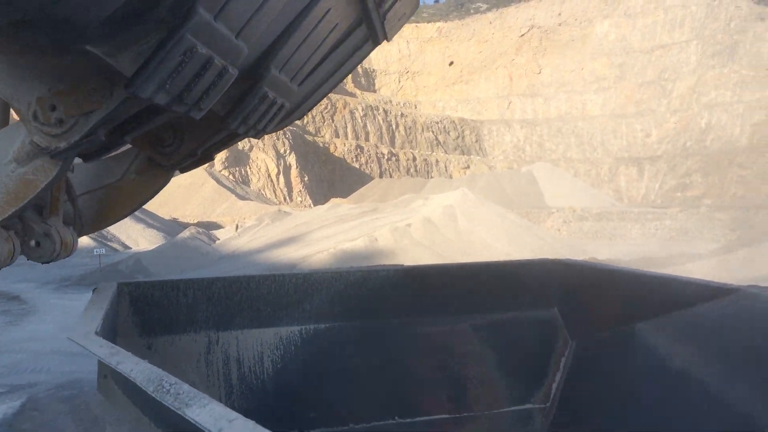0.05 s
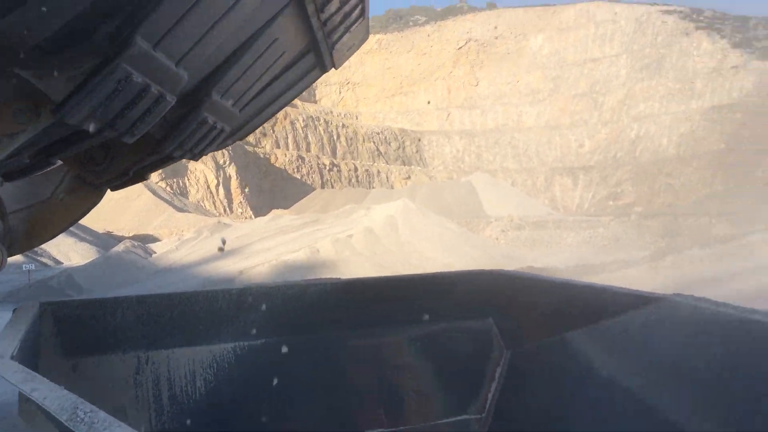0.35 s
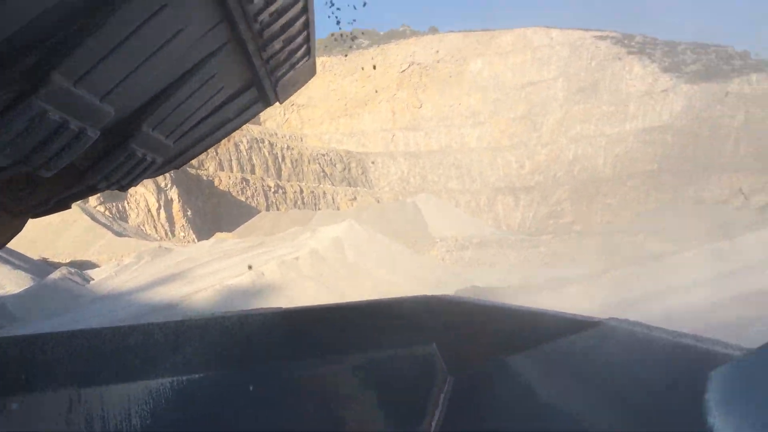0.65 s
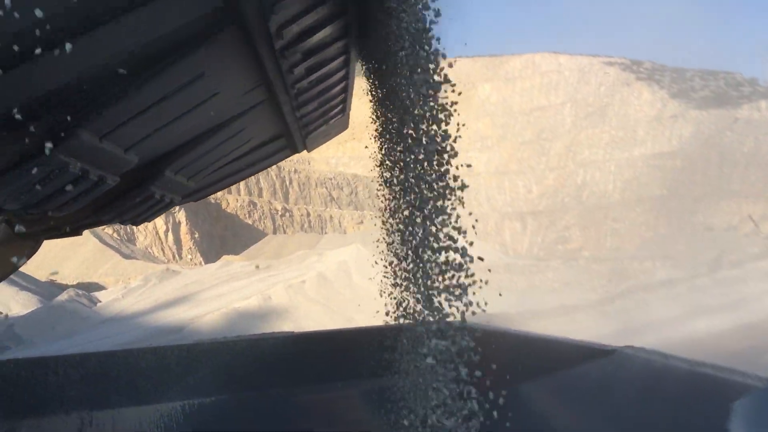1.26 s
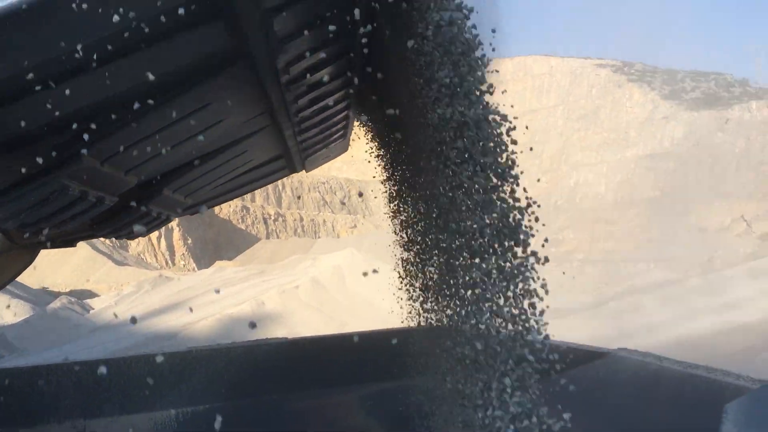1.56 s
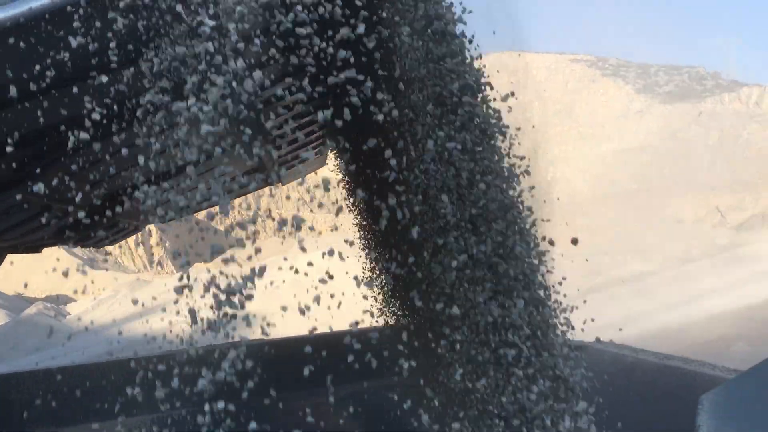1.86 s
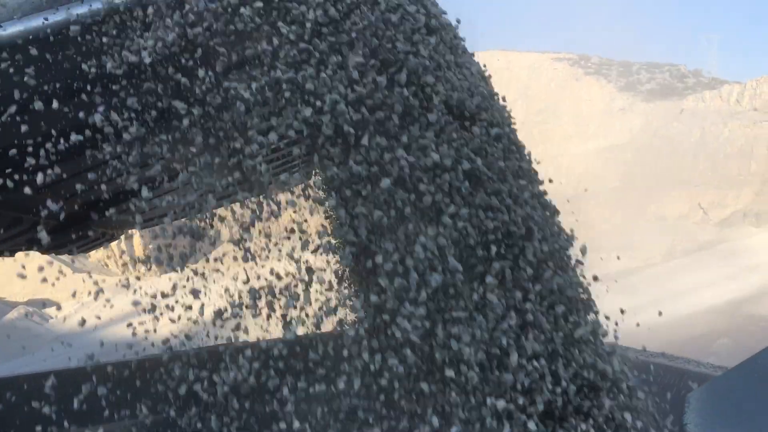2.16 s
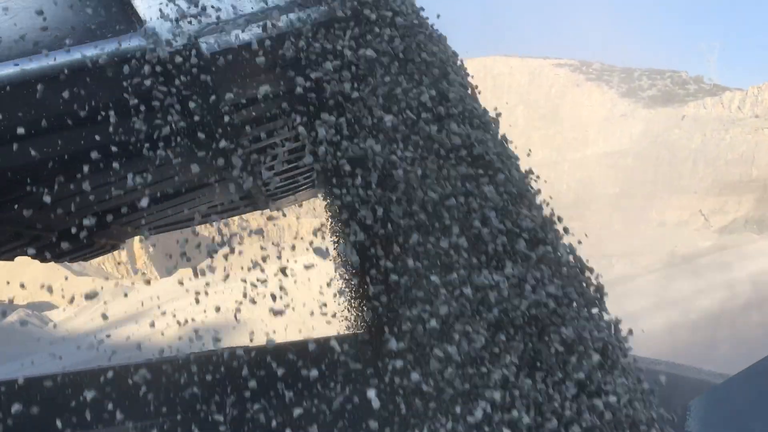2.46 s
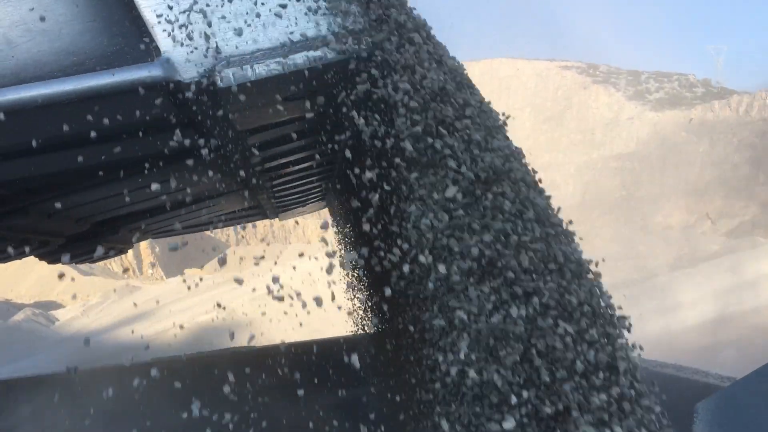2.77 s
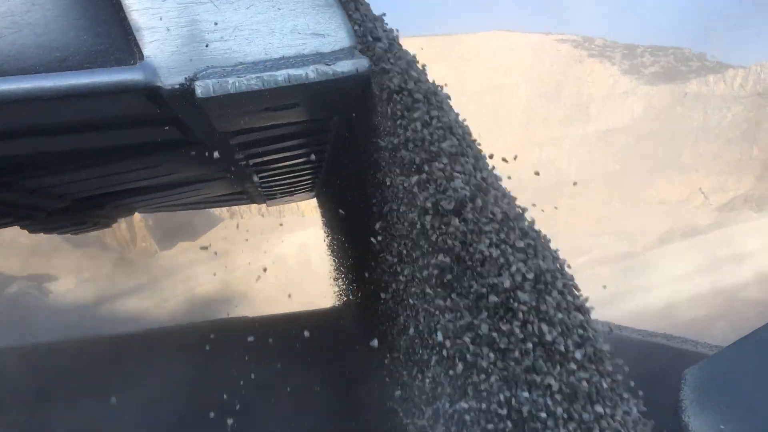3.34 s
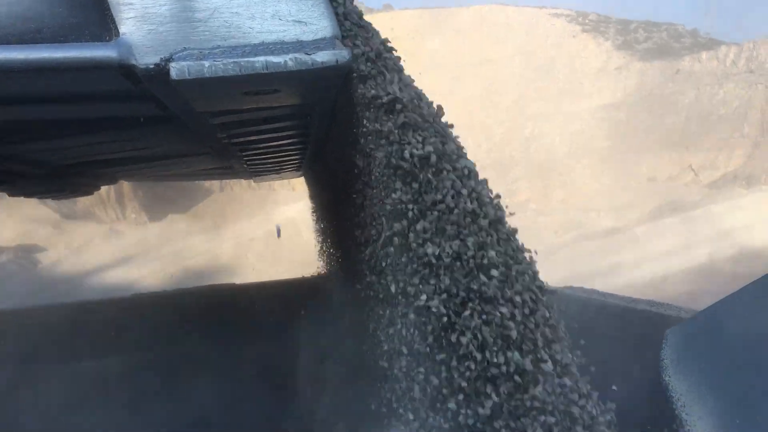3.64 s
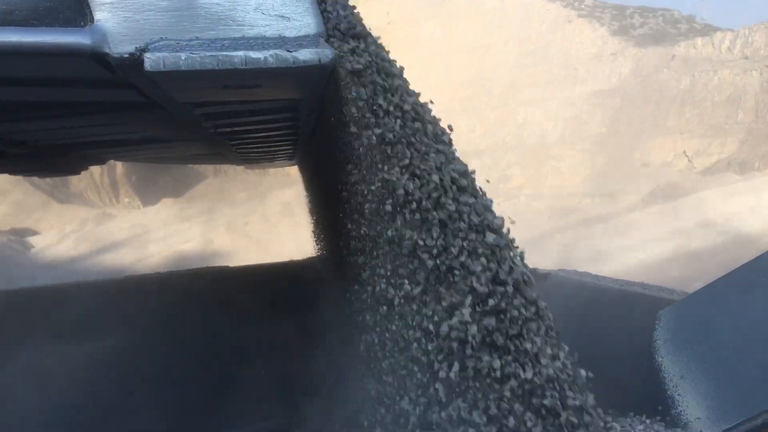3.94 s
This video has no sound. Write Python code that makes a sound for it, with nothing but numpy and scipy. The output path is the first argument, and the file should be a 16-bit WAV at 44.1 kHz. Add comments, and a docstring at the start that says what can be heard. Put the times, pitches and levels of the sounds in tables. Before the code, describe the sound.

A load of gravel tips into a metal hopper nearby. Light rattling knocks come first, then a hiss of grit swells into a continuous rush of stones, all over a loud, low diesel drone.

```python
"""Tipping crushed stone into a steel hopper

A dumper's diesel engine drones close by at steady revs. Its rising bed rattles and the first
stones clink. Fine grit starts to hiss down the steel, then the whole load slides and pours:
thousands of tiny stone-on-stone hits a second blend into a rush, and the hopper booms under it."""
import sys
import numpy as np
from scipy import signal
from scipy.fft import rfft, irfft
from scipy.io import wavfile
from scipy.ndimage import uniform_filter1d

SR = 44100
rng = np.random.default_rng(int(sys.argv[2]) if len(sys.argv) > 2 else 0)


def pcm_store(signal):
    """Save signal as 16-bit PCM."""
    levels = np.round(np.clip(np.atleast_2d(signal), -1, 1) * 32767)
    wavfile.write(sys.argv[1], SR, levels.astype(np.int16).T)


N = 176400  # 4 seconds

# How strongly coarse stone and fine grit flow. Each row: time in seconds, level in dB.
STONE_LEVELS = [(0, -82), (1.3, -56), (1.8, -47), (1.97, -39.5), (2.15, -36), (2.29, -33), (2.52, -33.5),
                (2.68, -37), (3.3, -36.5), (4, -37.5)]
GRIT_LEVELS = [(0, -84), (1.15, -65), (1.35, -52), (1.65, -47), (1.85, -43), (2.0, -39), (2.15, -36),
               (2.35, -33.5), (2.9, -33.5), (3.4, -34.5), (4, -35.5)]
# The tone of stone, of grit and of a dull knock. Each row: frequency in Hz, relative level in dB.
STONE_TONE = [(200, -4), (700, -5), (1000, -4), (1300, -2.5), (1550, -2), (1800, 1), (2080, 0.5),
              (2500, -3), (2850, -2.5), (3150, 0.5), (3700, 0), (4050, 1), (4900, -5), (5600, -2.5),
              (6500, -3.5), (7500, -5.5), (10000, -11.5), (15000, -27)]
GRIT_TONE = [(3000, -21), (5000, -12.5), (6300, -6), (7400, -9.5), (8600, -1), (9800, -0.5), (10450, -8),
             (10900, 0), (12600, 0.5), (14000, -1.5), (15600, -4)]
KNOCK_TONE = [(700, -11), (1500, 3), (2100, 8), (2700, 4), (3400, 5.5), (4300, 3), (5200, -2.5),
              (6500, -3.5), (8000, -12.5), (15000, -26)]
# The notes that ring in the hopper, the bed's panels, bright steel and a struck edge.
# Each row: frequency in Hz, width in Hz (narrow rings longer), relative level in dB.
HOPPER_NOTES = [(158, 49, -1.5), (312, 140, -11), (714, 150, -5), (1807, 50, -9), (2029, 36, -5),
                (2110, 45, -10)]
PANEL_NOTES = [(2037, 28, -1), (2500, 41, -8.5), (3260, 63, -1.5)]
STEEL_NOTES = [(3284, 40, -7), (6140, 30, -4), (6700, 80, -1), (8161, 200, -5), (8600, 500, 2.5),
               (9060, 80, -2), (9100, 400, -17), (12460, 1500, -13)]
EDGE_NOTES = [(6940, 19, -1), (7080, 300, -4)]
# Knocks of the bed and first stones. Each row: start in seconds, dull level in dB, ring level in dB.
BED_KNOCKS = [(0.002, -45, -59), (0.046, -47, -56), (0.086, -44, -56), (0.131, -42.5, -62),
              (0.174, -42, -48), (0.214, -43, -56), (0.258, -48, -59), (0.299, -44, -59), (0.343, -41, -53),
              (0.386, -41, -50.5), (0.426, -39, -52), (0.469, -40.5, -51), (0.510, -41.5, -57),
              (0.553, -40.5, -67), (0.596, -48.5, -61), (0.640, -45, -57), (0.683, -42, -69),
              (0.721, -46, -60), (0.763, -38, -41.5), (0.809, -41, -45.5), (0.848, -38.5, -50),
              (0.889, -43, -54), (0.938, -44.5, -48.5), (0.977, -42, -49), (1.059, -37.5, -48.5),
              (1.103, -38.5, -49), (1.144, -42.5, -59), (1.228, -40, -58), (1.270, -46, -60),
              (1.312, -39.5, -57), (1.396, -43, -56), (1.441, -39, -53), (1.483, -41, -47),
              (1.526, -44, -56), (1.568, -42, -57), (1.610, -40, -60), (1.691, -45, -47),
              (1.776, -41.5, -56), (1.821, -42, -53), (1.901, -39, -59), (1.986, -40.5, -54)]
# Sprays of grit on steel, and stones hitting an edge. Each row: start in seconds, level in dB.
GRIT_SPRAYS = [(0.514, -56), (0.655, -58), (0.766, -54), (0.811, -57), (1.062, -57), (1.324, -39),
               (1.371, -47)]
EDGE_PINGS = [(1.812, -50), (2.747, -30.5)]
# The tones in the exhaust note. Each row: multiple of the engine's turning rate, relative level in dB.
EXHAUST_TONES = [(1, -2.5), (2, 1.5), (3, -13), (4, -9.5), (5, -21), (6, -10.5), (7, -28.5), (8, -13.5),
                 (9, -30), (10, -32.5), (11, -19.5), (12, -26.5), (13, -28), (14, -36), (15, -29),
                 (16, -43), (17, -42), (18, -28.5), (19, -29.5), (20, -44.5), (21, -34), (22, -34.5),
                 (23, -35), (24, -50.5), (25, -57), (26, -46), (27, -38.5), (28, -47)]
# One exhaust tone swells and sinks. Each row: time in seconds, change in dB.
DRONE_SWELL = [(0, -4), (.45, 0.5), (.8, 3.5), (1.2, -1.5), (1.5, -3.5), (1.8, 0.5), (2.2, 2.5), (4, 2)]
# Rough noise of the engine and its fan. Each row: frequency in Hz, relative level in dB.
MACHINE_TONE = [(20, -43), (35, -8), (66, 6.5), (110, -4), (165, 1), (215, -8.5), (290, -7), (335, -6.5),
                (400, -10), (480, -23), (560, -7.5), (700, -10), (950, -15), (1300, -18), (1550, -23.5),
                (2100, -20.5), (2700, -26), (3800, -28.5), (5200, -35.5), (9000, -44), (11000, -48.5),
                (15500, -49)]

TURN_HZ, DRONE_MULTIPLE = 47.4, 6  # engine turns per second; the tone that swells
UNEVEN_LAG_S = 0.002813  # delays the odd tones, which carry the engine's limp
EXHAUST_DB, MACHINE_DB = -13, -31
HOPPER_DB, PANEL_DB = -4.5, -9.5  # compared with the stone and with the dull knocks


def pouring_load():
    """Grit hisses, coarse stone clatters and the hopper booms, all surging with the flow."""
    surge = undb(0.35 * wander(24.8))
    stone_flow = undb(curve(STONE_LEVELS)) * surge
    grit_flow = undb(curve(GRIT_LEVELS)) * surge
    grit_hits = scatter(impacts(per_s=11000, spread_db=2.5), wet_db=-1.5, decay_s=.003)
    stone_hits = scatter(impacts(per_s=9000, spread_db=2.5), wet_db=-2, decay_s=.006)
    grit = colour(grit_flow * grit_hits, GRIT_TONE)
    stone = colour(stone_flow * stone_hits, STONE_TONE)
    boom = undb(HOPPER_DB) * stone_flow * ring(impacts(per_s=1500, spread_db=4.2), HOPPER_NOTES)
    return grit + stone + boom


def rattling_bed():
    """Each knock is a quick cluster of hits: a dull clack, humming panels and a bright steel ring."""
    dull_level = bursts([(s, db) for s, db, _ in BED_KNOCKS], attack_s=.0083, decay_s=.019)
    bright_level = bursts([(s, db) for s, _, db in BED_KNOCKS], attack_s=.0089, decay_s=.026)
    dull = dull_level * impacts(per_s=16000, spread_db=1.8)
    bright = bright_level * rng.standard_normal(N)
    panels = undb(PANEL_DB) * np.std(dull) * ring(dull, PANEL_NOTES)
    steel = np.std(bright) * ring(bright, STEEL_NOTES)
    return colour(dull, KNOCK_TONE) + panels + steel


def grit_sprays():
    """Short sprays of grit hiss on bare steel."""
    level = bursts(GRIT_SPRAYS, attack_s=.003, decay_s=.012)
    return colour(level * impacts(per_s=20000, spread_db=1.5), GRIT_TONE)


def edge_pings():
    """Single stones strike a steel edge and set it ringing."""
    strike = bursts(EDGE_PINGS, attack_s=.002, decay_s=.02) * rng.standard_normal(N)
    return np.std(strike) * ring(strike, EDGE_NOTES)


def diesel_engine():
    """Two unequal firings a turn ring the exhaust pipe; rough machine noise throbs along."""
    speed_hz = TURN_HZ * (1 + .00049 * wander(1.94) + .0009 * wander(41))  # slow drift, fast jitter
    angle = 2 * np.pi * np.cumsum(speed_hz) / SR
    multiples, levels = np.array(EXHAUST_TONES).T
    # The even tones outline the pipe's response, which shifts each tone in time.
    pipe_db = np.interp(np.arange(2 * len(multiples) + 1), multiples[1::2], levels[1::2])
    pipe_phase = np.angle(struck_response(pipe_db))
    exhaust = 0
    for k, db in enumerate(levels, 1):
        limp = (k % 2) * 2 * np.pi * k * TURN_HZ * UNEVEN_LAG_S
        waver_db = .5 * min(k / 6, 1) * wander(6.9)
        swell_db = curve(DRONE_SWELL) if k == DRONE_MULTIPLE else 0
        exhaust -= undb(db + waver_db + swell_db) * np.cos(k * angle + pipe_phase[k] - limp)
    throb = 1 + .14 * np.cos(2 * angle) + .066 * np.cos(angle / 2)  # each firing, and every two turns
    rough = colour(unit(throb * rng.standard_normal(N)), MACHINE_TONE)
    return undb(EXHAUST_DB) * unit(exhaust) + undb(MACHINE_DB) * rough


def impacts(per_s, spread_db):
    """Clicks of random collisions, many small and a few large."""
    hit = rng.random(N) < per_s / SR
    size = undb(spread_db * np.minimum(rng.exponential(size=N), 6))
    return unit(hit * size * rng.choice([-1, 1], N))


def scatter(x, wet_db, decay_s):
    """Give every hit a short tail of echoes and smaller hits; wet_db sets the tail's level."""
    keep = np.exp(-1 / (decay_s * SR))
    tail_level = np.sqrt(signal.lfilter([1 - keep], [1, -keep], x ** 2))
    return unit(x + undb(wet_db) * tail_level * rng.standard_normal(N))


def bursts(rows, attack_s, decay_s):
    """Loudness over time for a list of blows: each rises quickly, then dies away."""
    power = np.zeros(N)
    age = np.arange(SR // 2) / SR
    shape = np.minimum(age / attack_s, 1) * np.exp(-np.maximum(age - attack_s, 0) / decay_s)
    for start, db in rows:
        i = int(start * SR)
        power[i:i + len(age)] += (undb(db) * shape[:N - i]) ** 2
    return np.sqrt(power)


def ring(x, notes):
    """Let a sound shake an object so that it rings at its own notes."""
    total = 0
    for hz, width, db in notes:
        resonance = signal.iirpeak(hz, hz / width, fs=SR)
        total += undb(db) * unit(signal.lfilter(*resonance, x))
    return unit(total)


def colour(x, tone):
    """Shape a sound with a tone table; white noise would keep its power."""
    hz, db = np.array(tone).T
    grid_hz = np.maximum(np.arange(N + 1) * SR / (2 * N), 1)
    response = struck_response(np.interp(np.log(grid_hz), np.log(hz), db))
    response /= np.sqrt(np.mean(abs(response) ** 2))
    return irfft(rfft(x, 2 * N) * response)[:N]


def struck_response(db):
    """Turn levels at evenly spaced frequencies into a filter that rings only after a hit."""
    cepstrum = irfft(np.log(undb(db)))
    half = len(cepstrum) // 2
    cepstrum[1:half] *= 2
    cepstrum[half + 1:] = 0
    return np.exp(rfft(cepstrum))


def wander(per_s):
    """A smooth random wobble, about 1 in size, that picks per_s new values a second."""
    hold = int(SR / per_s)
    steps = np.repeat(rng.standard_normal(N // hold + 1), hold)
    return 1.3 * uniform_filter1d(uniform_filter1d(steps, hold), hold)[:N]


def curve(rows):
    """Join rows of time and value with straight lines."""
    return np.interp(np.arange(N) / SR, *np.array(rows).T)


def undb(db):
    """Turn decibels into a number to multiply by."""
    return 10 ** (np.asarray(db) / 20)


def unit(x):
    """Scale a sound to an average (rms) level of 1."""
    return x / np.sqrt(np.mean(x ** 2))


def scene():
    """Engine, rattling bed and falling stone in one channel, heard from the hopper's edge."""
    return (diesel_engine() + rattling_bed() + grit_sprays() + edge_pings() + pouring_load())[None]


def record(dry):
    """Steeply cut the highest treble, above 15700 Hz."""
    return signal.sosfilt(signal.ellip(12, .1, 90, 15700, fs=SR, output="sos"), dry)


dry = scene()
out = record(dry)
pcm_store(out)
```